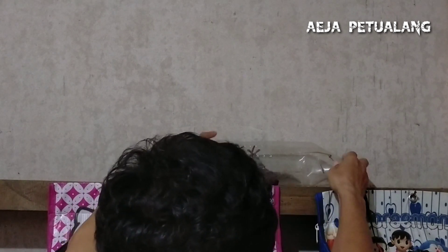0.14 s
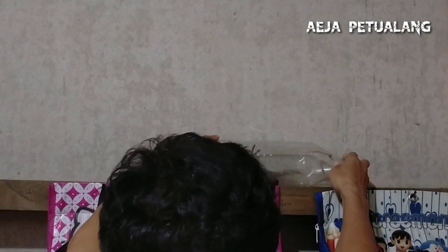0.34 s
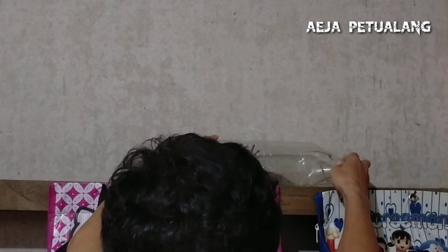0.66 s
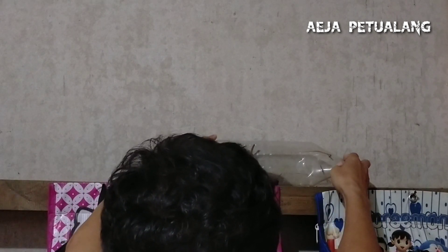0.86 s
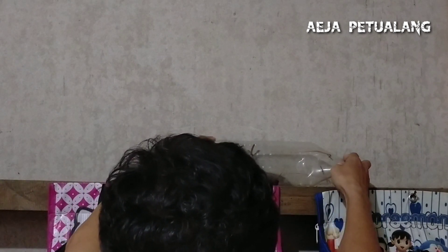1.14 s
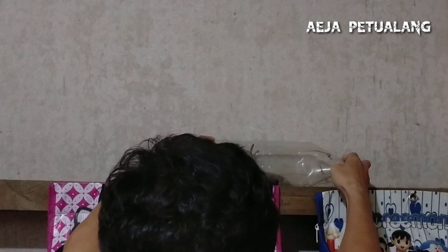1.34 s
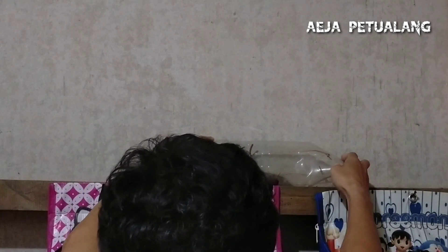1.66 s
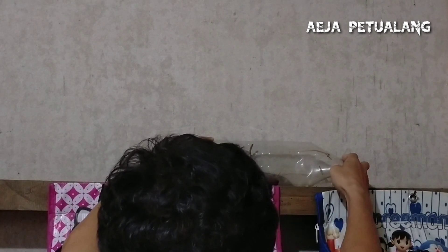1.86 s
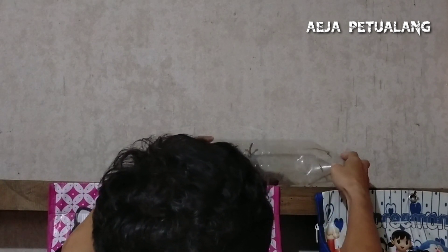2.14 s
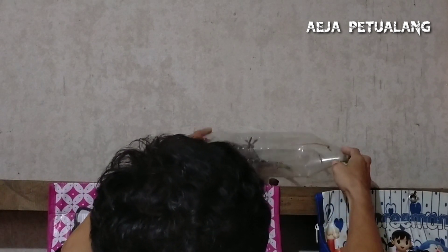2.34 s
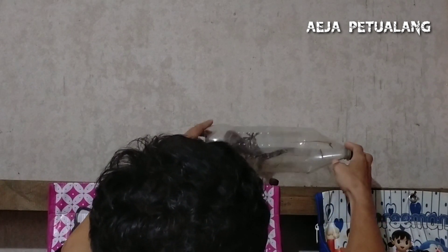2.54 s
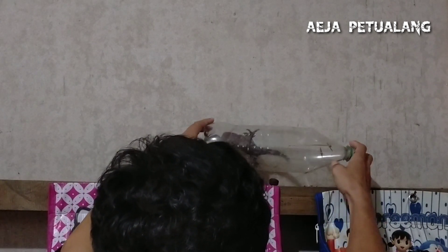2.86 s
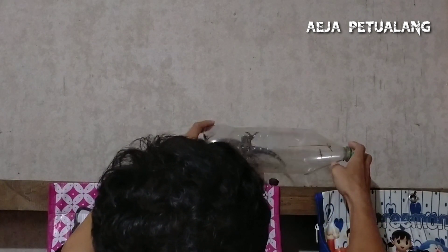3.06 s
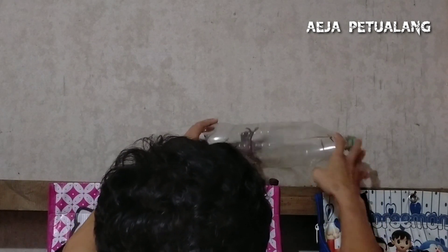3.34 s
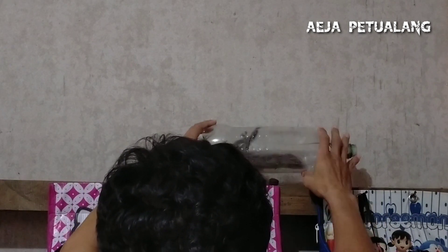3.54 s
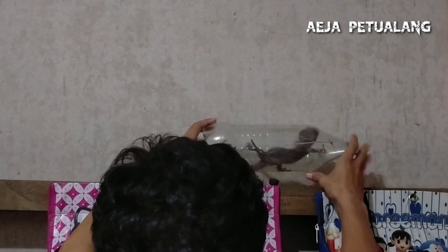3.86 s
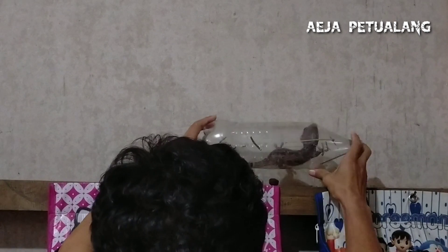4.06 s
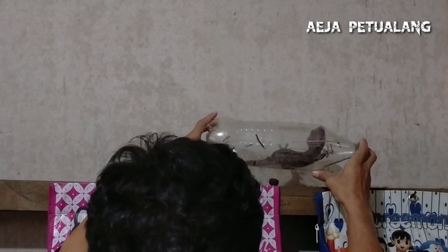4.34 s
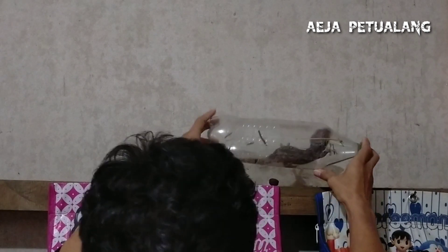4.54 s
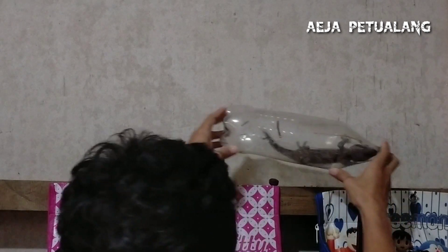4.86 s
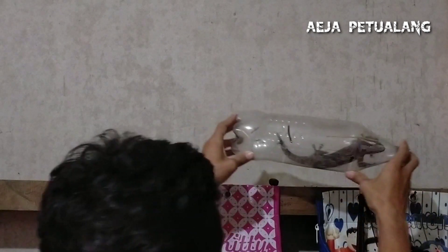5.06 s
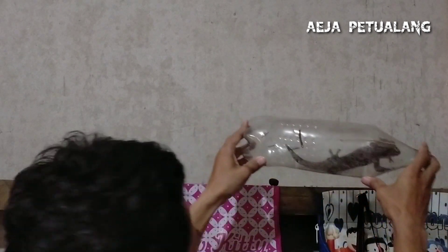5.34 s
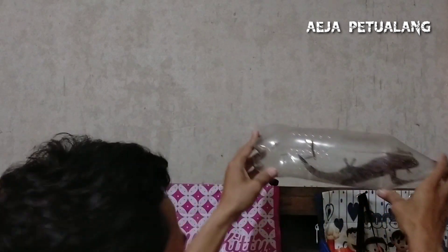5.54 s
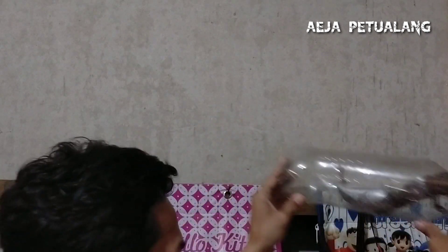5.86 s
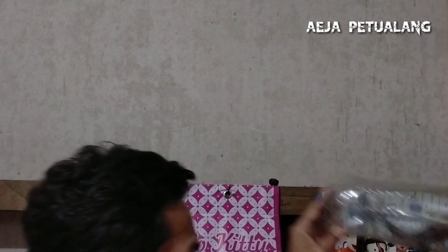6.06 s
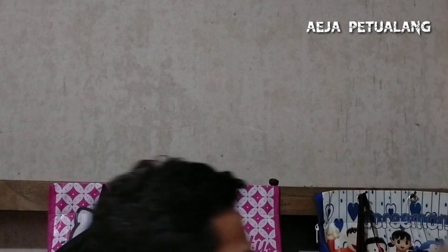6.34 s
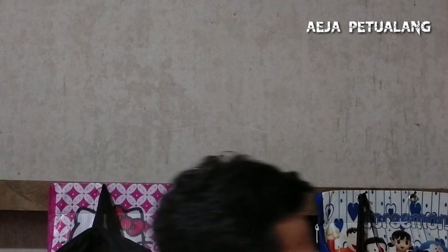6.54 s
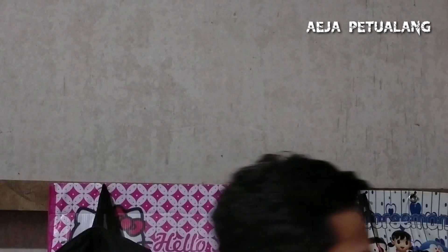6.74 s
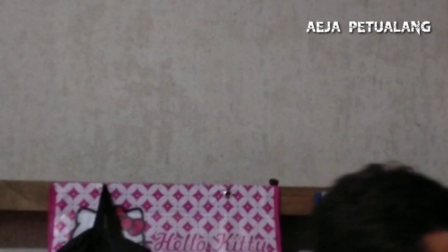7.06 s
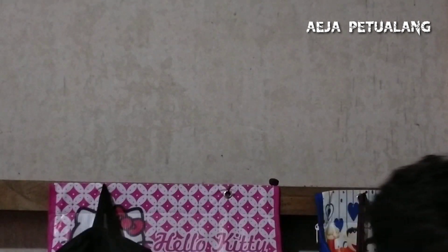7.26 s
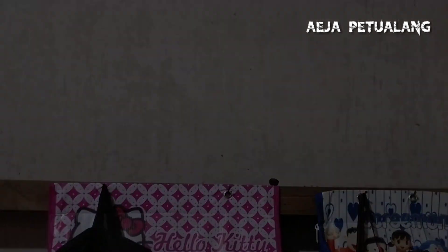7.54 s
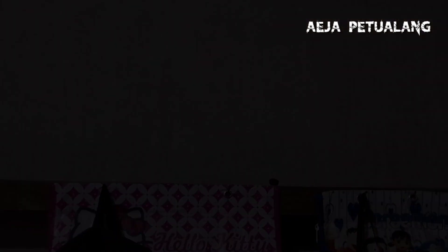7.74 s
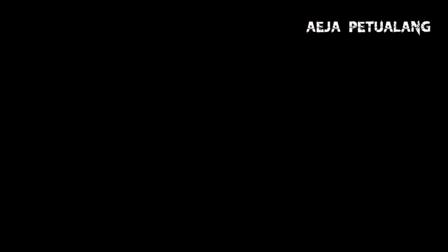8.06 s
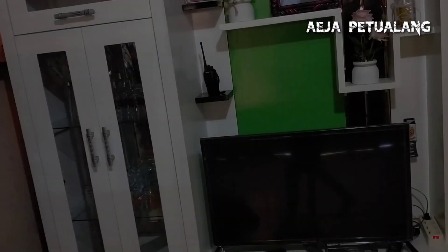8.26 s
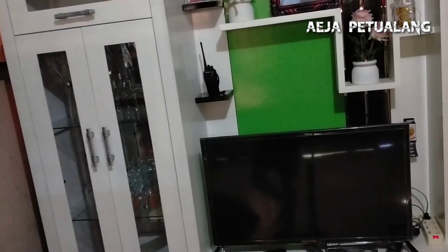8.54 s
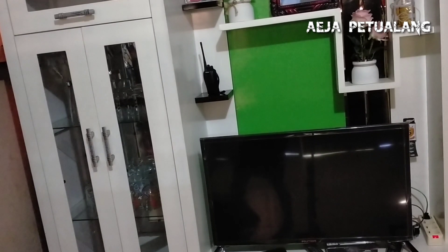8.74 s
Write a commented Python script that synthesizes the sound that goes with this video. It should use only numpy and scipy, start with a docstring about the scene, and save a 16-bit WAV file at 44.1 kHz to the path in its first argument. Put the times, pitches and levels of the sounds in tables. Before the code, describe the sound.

Hollow, bright plastic crunches come first, close to the microphone, with fingers and claws scratching the shell. A quiet pause follows, then more crackling that peaks in rapid hard pops and eases into separate bursts. Movement away leaves soft clothing rustle, a couple of dull thuds and tiny clicks over faint air and low rumble, dipping to silence before coming back.

```python
"""Plastic bottle lifted off a wall

A thin plastic bottle with a lizard inside is gripped, lifted off a wall and carried away in a small bare room.
The shell snaps in bursts of tiny creases, fingers and claws scratch it as streams of clicks, and the room
answers with a tail of dying noise. Clicks, narrow-band thumps, ticks, squeaks and hums, two dull bumps and
rustling clothes are shaped clicks or noise, over steady room air and a low rumble. Near the end the sound
fades out and in again."""
import sys
import numpy as np
from scipy import signal
from scipy.fft import rfft, irfft
from scipy.io import wavfile

SR = 44100
rng = np.random.default_rng(int(sys.argv[2]) if len(sys.argv) > 2 else 0)


def waveform_to_disk(signal):
    """Save audio, clipped to [-1, 1], as 16-bit WAV at the path in sys.argv[1]."""
    frames = np.transpose(np.atleast_2d(signal))
    scaled = np.clip(frames, -1, 1) * 32767
    samples = np.round(scaled).astype(np.int16)
    wavfile.write(sys.argv[1], SR, samples)


N = 392490
TIME = np.arange(N) / SR

# All levels in the tables are relative: later gains shift them.

# Snaps of the shell: start_s, level_db, hollow_db (low register over that level),
# brightness_db, build_s (time the buckling takes)
SHELL_SNAPS = [(.054, -55, -4, -9, 0.0054), (.111, -54.5, 2, -20, 0.0077),
               (.174, -55.5, 5.5, -11.5, 0.0054), (.225, -52.5, 2, -20.5, 0.0075),
               (.297, -51.5, 1, -19.5, .003), (.3212, -39, -1, 3.5, 0.01), (.396, -39, -2, -3.5, 0.0035),
               (.41, -44, -12.5, 0, 0.013), (0.483, -35, -12, -1.5, 0.0056), (.519, -29, -14.5, -1, 0.0075),
               (0.5425, -30.5, -8, 0.5, 0.0096), (.598, -34, 1.5, 0, 0.0058), (0.623, -37, 2, -11, 0.0041),
               (0.67, -44.5, -5, -9, 0.013), (.984, -66.5, 2, 0, .005), (1.074, -67.5, -2, -2, .006),
               (1.809, -67.5, -5, -1, .012), (2.073, -66.5, 3, -10, 0.0065),
               (2.131, -62.5, 5.5, -13, 0.0067), (2.1577, -55, -12, -1.5, 0.019), (2.25, -52, -2, -8, .009),
               (2.336, -52.5, -20, -2.5, 0.018), (2.398, -47.5, -9, -10, 0.0088),
               (2.4394, -53, -16, 0, 0.011), (2.4895, -40, -20, -1, 0.0066),
               (2.559, -48.5, -8, -0.5, 0.016), (2.6673, -48, -7, -17, .003), (2.69, -49.5, 3, -8, 0.0071),
               (2.7331, -45.5, -10, -3, 0.0067), (2.837, -52, 3, -4, 0.0054), (2.851, -40, -10, -3, 0.0096),
               (2.972, -58.5, -11, -8, .004), (3.022, -58, -3.5, -4, 0.0075),
               (3.1194, -38.5, -8.5, -4, .008), (3.311, -44.5, -6.5, -2, 0.013),
               (3.427, -39, -4, -4.5, 0.0042), (3.456, -31, -9.5, 3.5, 0.0094),
               (3.485, -36, -12.5, -1.5, 0.003), (3.5453, -41, -4, 0.5, .006), (3.5632, -27, -2, 2, 0.0035),
               (3.591, -52, -14, -3.5, .0035), (3.639, -41, -12, 4.5, 0.028),
               (3.7345, -38.5, -14, -6, 0.015), (3.7831, -37.5, -2.5, 5, 0.0042),
               (3.8335, -32.5, -7.5, -5.5, 0.0056), (3.869, -35, -1.5, -11, 0.011),
               (3.904, -36, -8, -0.5, 0.0066), (3.928, -43.5, 0.5, 12, 0.0051),
               (3.973, -42, -15, 5, 0.0061), (3.989, -35, -14, -7.5, 0.0076), (4.023, -47, -4, -10, 0.0044),
               (4.1502, -48.5, -6, 6.5, 0.009), (4.276, -50, -3, -4.5, .012),
               (4.3065, -60.5, -6, -2.5, .004), (4.4396, -38.5, -4.5, 7.5, 0.0065),
               (4.535, -36.5, -0.5, 0, 0.0093), (4.553, -39.5, -12.5, -1, 0.0073),
               (4.728, -54, -5, -6.5, .008), (4.767, -37, 1, 6, 0.0071), (4.835, -29.5, -4, -1, 0.0084),
               (4.856, -36.5, -5, -0.5, 0.0061), (4.894, -36.5, -2.5, 4.5, 0.016),
               (4.9317, -47, -7, -22, .0045), (5.348, -67, 0, 2.5, 0.0094), (5.932, -64, -2, 9.5, 0.013),
               (5.969, -65.5, 6, 13.5, 0.014), (6.096, -67, 9, 5, 0.0088), (6.189, -55.5, -5, -3, 0.013),
               (6.237, -62.5, 5, -9, .005), (6.293, -55.5, -4, 0, 0.013), (6.652, -53, -7, 3, 0.0086),
               (7.207, -66, -6, -4, 0.0083), (7.741, -62.5, -10, 5, .007)]


def snaps():
    """Each snap is a rush of tiny creases, split into registers; a sharper one tilts towards the treble."""
    wall = shell(grains(per_s=7000, spread_db=1.0), ring_db=-7.0)
    jolted_wall = wall * creases()
    start_s, snap_db, hollow_db, bright_db, build_s = np.transpose(SHELL_SNAPS + ticks())

    def part(low_hz, high_hz, part_db, colour_db, t60, haste):
        """One register of the wall, struck by every snap; more haste means a quicker build."""
        texture = band(jolted_wall, low_hz, high_hz, order=4)
        out = np.zeros(N)
        gains = from_db(snap_db + part_db + colour_db)
        for when, gain, build in zip(start_s, gains, build_s):
            add(out, when, gain * blow(texture, when, build / haste, t60))
        return out

    # the factors on bright_db say how far each register follows a snap's brightness
    hollow = part(low_hz=249, high_hz=690, part_db=-0.03, colour_db=hollow_db, t60=0.034, haste=0.68)
    body = part(low_hz=705, high_hz=1185, part_db=-0.1, colour_db=-0.15 * bright_db, t60=0.049, haste=0.92)
    clack = part(low_hz=1234, high_hz=2206, part_db=-1.0, colour_db=0.1 * bright_db, t60=0.037, haste=1.2)
    crack = part(low_hz=2290, high_hz=4910, part_db=-3, colour_db=0.39 * bright_db, t60=0.062, haste=0.85)
    fizz = part(low_hz=5130, high_hz=18000, part_db=-5.5, colour_db=bright_db, t60=0.091, haste=1.9)
    return hollow + body + clack + crack + fizz


# The held shell also ticks faintly at random
TICKS_PER_S, TICK_DB, TICK_SPREAD_DB, TICK_BUILD_S = 2.9, -71.5, 3.5, 0.0076


def ticks(until_s=6.9, hollow_db=-1, bright_db=-1):
    """Faint snaps at loose intervals, as rows like those of the loud ones."""
    rows = []
    for k, (when, size, colour) in enumerate(rng.random((40, 3))):
        if k + when < until_s * TICKS_PER_S:
            start_s = (k + when) / TICKS_PER_S
            level_db = TICK_DB + TICK_SPREAD_DB * (2 * size - 1)
            brightness_db = bright_db + TICK_SPREAD_DB * (2 * colour - 1)
            rows.append((start_s, level_db, hollow_db, brightness_db, TICK_BUILD_S))
    return rows


def creases(per_s=450, t60=0.011, steady=1.5, size=1000):
    """Single creases pop one after another and jolt the whole wall; gain of rms 1."""
    pops = rng.exponential(1, N) * (rng.random(N) < per_s / SR)
    dying = from_db(-60 * TIME[:size] / t60)
    jolts = np.abs(signal.oaconvolve(pops, dying)[:N])
    return rms_one(steady + jolts)


# Low resonances of the shell at rest: pitch_hz, width_hz, level_db
RESTING_MODES = [(530.2, 56.5, 7.5), (726, 97, -3.5), (1028, 160, 5.5), (1550, 160, -5), (2280, 1100, 2)]
# Broad colour of the shell: pitch_hz, level_db
SHELL_COLOUR = [(200, -14.5), (255, -8.5), (385, -9), (465, -2), (640, -3), (900, 0), (1700, -1),
                (2600, -8.5), (3800, -11), (4700, -18), (5800, -17), (7200, -16), (8300, -11),
                (9600, -18.5), (12500, -21), (15500, -23)]
# How the dented wall's springing back moves its resonances: time_s, pitch_ratio (1 = at rest)
WALL_STIFFNESS = [(.65, 0.96), (2.2, 1.001), (4.82, 0.992), (4.92, 1.1)]


def shell(x, ring_db):
    """The wall's dense high modes give a broad colour; its few low ones ring and move with its stiffness."""
    pitch_ratio = np.interp(TIME, *np.transpose(WALL_STIFFNESS))
    phase = 2 * np.pi * np.cumsum(pitch_ratio) / SR  # for a pitch of 1 Hz
    ring = sum(from_db(db) * resonance(x, hz * phase, width) for hz, width, db in RESTING_MODES)
    return rms_one(coloured(x, SHELL_COLOUR) + from_db(ring_db) * rms_one(ring))


# Small, hard, bright clicks: start_s, level_db
HARD_CLICKS = [(2.913, -51), (3.019, -55), (3.322, -40), (6.6252, -39.5), (6.8515, -48.5), (6.876, -58),
               (7.143, -61)]


def clicks(low_hz=7500):
    """Tiny hard contacts that sound only in the top treble."""
    texture = band(grains(per_s=2400, spread_db=-6), low_hz, 20700)
    out = np.zeros(N)
    for s, db in HARD_CLICKS:
        add(out, s, from_db(db) * blow(texture, s, build_s=0.00088, t60=0.029))
    return out


# Brief narrow-band sounds (a low thump, ticks, squeaks and faint hums):
# start_s, pitch_hz, width_hz, level_db, rise_s, t60_s (time to die by 60 dB)
NARROW_SOUNDS = [(.42, 170, 50, -51.5, 0.018, 0.17), (1.171, 2280, 600, -57, .0027, .045),
                 (3.02, 5300, 800, -54.5, 0.0043, .07), (3.02, 11100, 1200, -63, .008, .07),
                 (3.458, 1507, 261, -26, 0.0044, .05), (4.152, 2640, 690, -41.5, 0.0069, 0.049),
                 (4.97, 604, 61, -53, 0.055, 0.27), (6.04, 2650, 700, -65, .014, 0.36),
                 (6.402, 2480, 1300, -51.5, 0.011, 0.055), (7.645, 600, 49.5, -65, 0.1, 0.22),
                 (8.739, 2290, 910, -57, 0.0032, .09), (8.74, 1050, 300, -69, 0.019, .3),
                 (8.76, 542, 24.8, -70, 0.032, 0.33)]


def narrow_sounds():
    """A low thump, ticks, squeaks and faint hums: noise in one narrow band each, which swells and dies away."""
    out, age = np.zeros(N), TIME[:SR // 3]
    for s, hz, width_hz, db, rise_s, t60 in NARROW_SOUNDS:
        phase = 2 * np.pi * hz * TIME[:N // 8]
        # only the end is used, when the resonance has settled
        tone = resonance(rng.standard_normal(N // 8), phase, width_hz)[-len(age):]
        shape = np.minimum(age / rise_s, 1) * from_db(-60 * np.maximum(age - rise_s, 0) / t60)
        add(out, s, from_db(db) * unit_energy(tone * shape) * np.sqrt(np.sum(shape ** 2)))
    return out


# Strokes of fingers and claws over the shell: start_s, held_s, level_db
SCRATCH_STROKES = [(0, 0.0099, -45), (.05, 0.22, -57), (.37, 0.11, -45), (.68, 0.041, -43.5),
                   (.8, 0.37, -70), (2.3, .53, -53), (2.95, 0.11, -56.5), (3.41, 0.033, -50.5),
                   (3.66, 0.11, -44), (3.86, 0.096, -38.5), (4.82, 0.1, -39.5), (5.1, 0.11, -62.5)]


def scratching(gain_db=-5.0, ring_db=-4, dull_hz=2400, crackle_db=-5, firm_db=-42):
    """A light rub mostly stirs the low resonances; a firm one also crackles."""
    pressure = strokes(SCRATCH_STROKES, attack_db_per_s=220.5, release_db_per_s=278.5)
    rub = shell(grains(per_s=1000, spread_db=2.5), ring_db)
    softener = signal.butter(1, min(dull_hz, 18000), fs=SR, output="sos")
    rub = rms_one(signal.sosfilt(softener, rub))
    firmness = np.sqrt(np.minimum(pressure / from_db(firm_db), 1))
    crackle = coloured(grains(per_s=720, spread_db=1.5), SHELL_COLOUR) * firmness
    jolts = creases(per_s=190, t60=0.017, steady=0.82)
    return pressure * jolts * (from_db(gain_db) * rub + from_db(crackle_db) * crackle)


# Dull bumps: start_s, level_db
DULL_BUMPS = [(6.399, -44), (6.533, -38)]
# Colour of a bump: pitch_hz, level_db
BUMP_COLOUR = [(70, -12), (220, 1), (380, -6), (550, 8.5), (800, -3.5), (1150, 3), (1800, -23), (2600, -19),
               (3500, -36), (8400, -28), (14000, -49)]


def bumps(gain_db=-1):
    """Soft, heavy contacts with little treble."""
    thud, out = coloured(rng.standard_normal(N), BUMP_COLOUR), np.zeros(N)
    for s, db in DULL_BUMPS:
        add(out, s, from_db(db + gain_db) * blow(thud, s, build_s=0.006, t60=0.043))
    return out


# Rustles of clothes as the person turns away: start_s, held_s, level_db
CLOTHES_RUSTLES = [(5.96, 0.16, -62.5), (6.28, 0.41, -60), (6.8, 0.49, -71.5), (7.64, 0.14, -65),
                   (8.0, 0.028, -65)]
# Colour of rubbing cloth: pitch_hz, level_db
CLOTH_COLOUR = [(80, -19), (160, -5), (240, -7), (370, -17.5), (560, -10.5), (800, -13), (1400, -13.5),
                (2700, -15), (5500, -27), (8300, -21.5), (11000, -28), (15500, -21)]


def clothes(gain_db=-3):
    """Cloth rubs in fine grains."""
    rubbing = strokes(CLOTHES_RUSTLES, attack_db_per_s=114, release_db_per_s=79)
    cloth = coloured(grains(per_s=3500, spread_db=2.0), CLOTH_COLOUR)
    return from_db(gain_db) * rubbing * cloth


def room(x, count=5, size=6000):
    """The bottle keeps moving, so the reflections change: short blocks of sound take different tails in turn."""
    tails, out = [room_tail() for _ in range(count)], np.zeros(N)
    for k, start in enumerate(range(0, N, size)):
        add(out, start / SR, signal.fftconvolve(x[start:start + size], tails[k % count]))
    return out


# How long the room rings: pitch_hz, t60_s (time to die by 60 dB)
ROOM_RINGING = [(150, 0.47), (500, 0.43), (1400, 0.44), (3700, 0.45), (9000, .38), (15000, 0.31)]


def room_tail(wet_db=-1, treble_db=-3, gap_s=0.0037, size=28000):
    """Bare walls return a dense tail that dies sooner in the top treble."""
    age, tail = np.arange(size) / SR, np.zeros(size)
    edges = np.geomspace(90, 18000, 10)
    for low, high in zip(edges, edges[1:]):
        hz = np.sqrt(low * high)
        dying = band(rng.standard_normal(size), low, high) * from_db(-60 * age / at_hz(ROOM_RINGING, hz))
        late = dying * np.clip(age / gap_s - 1, 0, 1)  # silent until the first reflections
        gain = from_db(wet_db + at_hz([(1500, 0.02), (8000, treble_db)], hz))
        tail += gain * np.sqrt(2 * (high - low) / SR) * unit_energy(late)
    return tail


# Colour of the room air: pitch_hz, level_db
AIR_COLOUR = [(60, -8.5), (150, -11.5), (400, -8.5), (500, -8.5), (800, -12.5), (1200, -12), (2500, -16.5),
              (4800, -24.5), (5600, -30), (8300, -25), (11000, -27.5), (15500, -28.5)]
# Colour of the low rumble: pitch_hz, level_db
RUMBLE_COLOUR = [(6, 11), (12, 7.5), (25, -2.5), (50, -7.5), (90, -15.5), (150, -11.5), (240, -22),
                 (400, -41)]
# Shifts of the body, heard as low rumble: start_s, held_s, level_db
BODY_SHIFTS = [(.42, 0.41, -55.5), (2.65, 0.45, -59.5), (3.65, 0.53, -56.5), (4.85, 0.034, -52),
               (6.15, 1, -59), (8.25, 0.13, -64.5)]
AIR_DB, RUMBLE_REST_DB = -70.5, -63.5


def background():
    """Steady room air, and rumble that follows the movement."""
    air = from_db(AIR_DB) * coloured(rng.standard_normal(N), AIR_COLOUR)
    movement = strokes(BODY_SHIFTS, attack_db_per_s=28.5, release_db_per_s=40)
    stir = np.hypot(from_db(RUMBLE_REST_DB), movement)
    rumble = stir * coloured(rng.standard_normal(N), RUMBLE_COLOUR, size=32768)
    return air + signal.sosfilt(signal.butter(2, 350, fs=SR, output="sos"), rumble)


def from_db(db):
    """Decibels to gain."""
    return 10 ** (np.asarray(db) / 20)


def rms_one(x):
    """Scale to an rms (average strength) of 1."""
    return x / np.sqrt(np.mean(x ** 2) + 1e-20)


def unit_energy(x):
    """Scale to a summed square of 1."""
    return x / np.sqrt(np.sum(x ** 2) + 1e-20)


def at_hz(points, hz):
    """Read a table on a log-frequency axis."""
    known_hz, values = np.transpose(points)
    return np.interp(np.log(np.maximum(hz, 1)), np.log(known_hz), values)


def band(x, low_hz, high_hz, order=2):
    """Causal band-pass: keep the sound between two pitches."""
    edges = [low_hz, min(high_hz, SR / 2 - 1000)]
    return signal.sosfilt(signal.butter(order, edges, "band", fs=SR, output="sos"), x)


def coloured(x, spectrum, size=8192):
    """Causal (minimum-phase) filter of unit power with a given colour."""
    hz = np.fft.rfftfreq(size, 1 / SR)
    low_cut = 1 + (spectrum[0][0] / (hz + 1)) ** 2  # weakens what lies below the table
    gain = from_db(at_hz(spectrum, hz)) / low_cut
    # folding the cepstrum puts the filter's energy as early as possible
    cepstrum = irfft(np.log(gain))
    cepstrum[1:size // 2] *= 2
    cepstrum[size // 2 + 1:] = 0
    response = unit_energy(irfft(np.exp(rfft(cepstrum))))
    return signal.oaconvolve(x, response)[:len(x)]


def grains(per_s, spread_db):
    """Random tiny clicks of uneven size; rms 1."""
    sizes = from_db(spread_db * np.minimum(rng.exponential(1, N), 4)) * rng.choice([-1, 1], N)
    return rms_one(sizes * (rng.random(N) < per_s / SR))


def resonance(x, phase, width_hz):
    """A steep-sided resonance whose centre follows a running phase; rms 1."""
    turn = np.exp(1j * phase)
    sides = signal.butter(2, width_hz / 2, fs=SR, output="sos")
    return rms_one((signal.sosfilt(sides, x / turn) * turn).real)


def blow(texture, s, build_s, t60, swell=0.59, size=5000):
    """The texture swells while the contact or buckling builds, then dies; loudest rms about 1."""
    age = np.arange(size) / SR
    build_s = max(build_s, .0003)
    shape = np.minimum(age / build_s, 1) ** swell * from_db(-60 * np.maximum(age - build_s, 0) / t60)
    start = min(max(round(s * SR), 0), N - size)
    return unit_energy(texture[start:start + size] * shape) * np.sqrt(np.sum(shape ** 2))


def strokes(rows, attack_db_per_s, release_db_per_s, size=40):
    """Gain over time of gestures that swell, hold and let go."""
    t = TIME[::size]
    gain = np.zeros(len(t))
    for s, held_s, db in rows:
        before_db = attack_db_per_s * np.clip(s - t, 0, 2)
        after_db = release_db_per_s * np.clip(t - s - held_s, 0, 2)
        gain += from_db(db - before_db - after_db)
    return np.interp(TIME, t, gain)


def add(track, s, sound):
    """Mix a sound in at a time."""
    start = max(round(s * SR), 0)
    track[start:start + len(sound)] += sound[:N - start]


def scene():
    """Bottle and handler in the room, on one microphone."""
    near = snaps() + clicks() + narrow_sounds() + scratching() + bumps() + clothes()
    return (near + room(near) + background())[None]


# The fader closes almost fully in a straight line, then opens again; its open gain is FADER_DB
FADE_CLOSED_S, FADE_OUT_S, FADE_OPENS_S, FADE_IN_S, FADER_DB = 8.108, 0.75, 8.22, 0.59, 2


def fader():
    """Gain of one fade out and in."""
    closing = (FADE_CLOSED_S - TIME) / FADE_OUT_S
    opening = (TIME - FADE_OPENS_S) / FADE_IN_S
    return from_db(FADER_DB) * np.clip(np.maximum(closing, opening), .004, 1)


CUTOFF_HZ = 16200


def record(dry):
    """The fader dips once; the top treble is cut."""
    top_cut = signal.ellip(10, .2, 70, CUTOFF_HZ, fs=SR, output="sos")
    return signal.sosfilt(top_cut, dry * fader())


dry = scene()
out = record(dry)
waveform_to_disk(out)
```